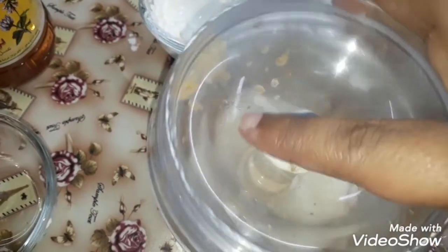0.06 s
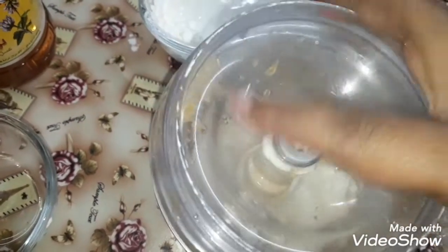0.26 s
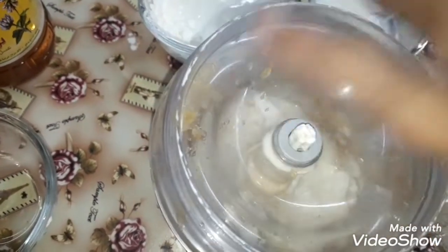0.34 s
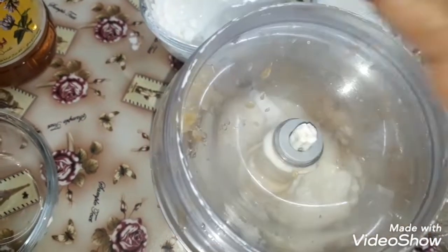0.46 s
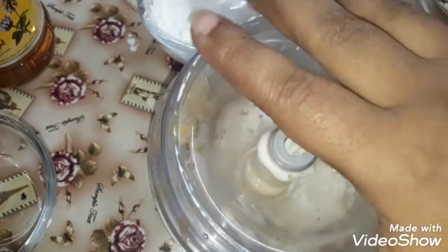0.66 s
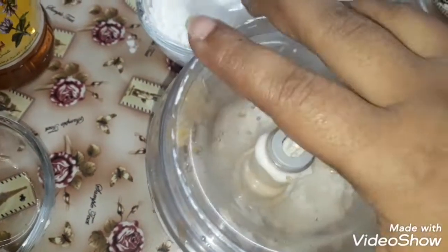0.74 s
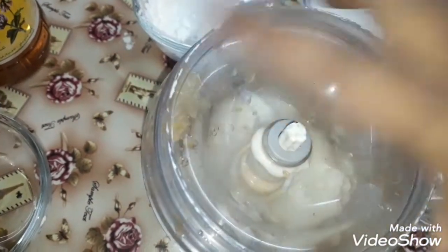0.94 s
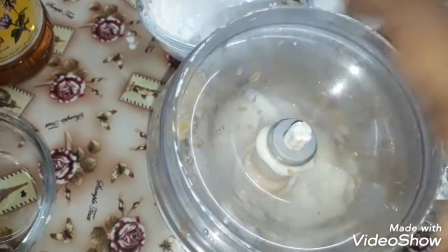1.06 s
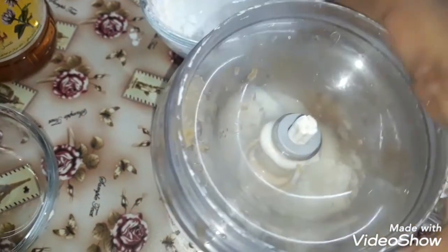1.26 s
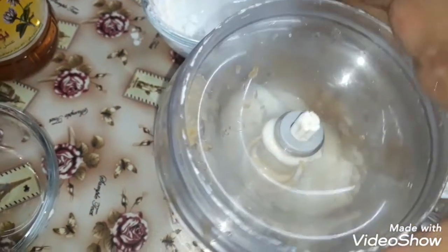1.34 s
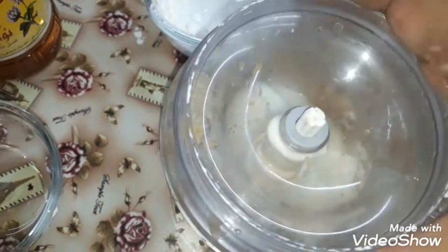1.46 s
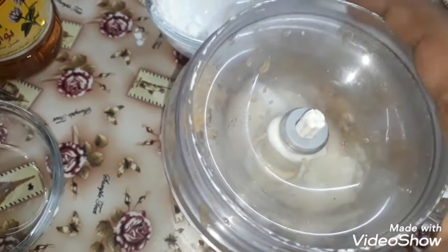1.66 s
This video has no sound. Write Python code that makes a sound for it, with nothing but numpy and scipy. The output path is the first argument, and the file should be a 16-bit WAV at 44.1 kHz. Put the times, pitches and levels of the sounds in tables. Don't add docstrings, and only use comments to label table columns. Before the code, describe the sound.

Hollow clacks of a clear plastic chopper bowl being nudged on a table, with faint finger rubs

```python
import sys
import numpy as np
from scipy import signal
from scipy.fft import rfft, irfft, next_fast_len
from scipy.io import wavfile
from scipy.ndimage import uniform_filter1d, map_coordinates

SR = 44100
rng = np.random.default_rng(int(sys.argv[2]) if len(sys.argv) > 2 else 0)


def undo_db(level):
    steps = np.asarray(level, float) / 20
    return 10 ** steps


def dump_mix(stems):
    frames = np.atleast_2d(stems).T
    limited = np.clip(frames, -1, 1)
    pcm = np.round(limited * 32767).astype(np.int16)
    wavfile.write(sys.argv[1], SR, pcm)


N = 74970


def unit(x):
    return x / np.sqrt(np.mean(x ** 2) + 1e-20)


def along(points, hz):
    f, v = np.transpose(points)
    return np.interp(np.log(hz + 1), np.log(f + 1), v)


def wobble(rate_hz):
    return map_coordinates(rng.standard_normal(200), [np.arange(N) * min(rate_hz, 90) / SR])


def filtered(x, response):
    m = next_fast_len(len(x) + 8192)
    return irfft(rfft(x, m) * response(np.fft.rfftfreq(m, 1 / SR)), m)[:len(x)]


def add(track, s, sound):
    part = track[round(s * SR):][:len(sound)]
    part += sound[:len(part)]


# (frequency [Hz], t60 [s])
KITCHEN_T60 = [(150, 0.18), (400, 0.32), (1500, 0.2), (4000, 0.2), (10000, 0.23)]
WET_DB, THUD_WET_DB, FIRST_WALL_S = -8.5, -12, 0.005


def kitchen(x, wet_db, feed=None):
    hz, t, z = signal.stft(rng.standard_normal(SR // 2), SR, nperseg=256)
    decay = undo_db(-60 * t / along(KITCHEN_T60, hz)[:, None])
    tail = signal.istft(z * decay, SR, nperseg=256)[1]
    feed = x if feed is None else feed
    delayed = np.pad(feed, (round(FIRST_WALL_S * SR), 0))
    wet = signal.fftconvolve(delayed, tail / np.linalg.norm(tail))
    return undo_db(wet_db) * wet + np.pad(x, (0, len(wet) - len(x)))


# (centre [Hz], width [Hz], level [dB])
HUM_BANDS = [(97, 18.4, -69), (188.6, 22, -67.5), (312, 10, -78.5), (405.5, 5.8, -72)]
# (frequency [Hz], level [dB])
MOTOR_LINES = [(99.8, -66), (398, -62.5)]
# (frequency [Hz], density [dB per Hz])
AIR_SPECTRUM = [(25, -25), (60, -10), (130, -13), (250, -6), (700, -8.5), (2200, -18.5), (6000, -30.5),
                (15500, -34.5)]
# (time [s], level [dB])
HAND_STIR = [(0, 3), (0.501, 2.5), (.57, -1), (.64, 4), (0.852, 1.5), (1.0, 1), (1.2, 2.5), (1.45, 0.5),
             (1.7, 3)]
AIR_DB, AIR_PATCH_DB, MOTOR_WAVER_DB = -60, 0.8, 2
BOOM_HZ, BOOM_WIDTH_HZ, BOOM_DB, BOOM_WAVER_DB = 350, 54, -67.5, 5.2


def noise_band(hz, width_hz):
    return unit(filtered(rng.standard_normal(N), lambda f: np.exp(-0.5 * ((f - hz) / width_hz) ** 2)))


def room_tone():
    t = np.arange(N) / SR
    z = signal.stft(rng.standard_normal(N + 512), nperseg=512)[2]
    patches = uniform_filter1d(rng.standard_normal(z.shape), size=6, axis=0)
    patches = uniform_filter1d(patches, size=10, axis=1)
    air = signal.istft(z * undo_db(AIR_PATCH_DB * unit(patches)), nperseg=512)[1][:N]
    air = undo_db(AIR_DB) * unit(filtered(air, lambda f: undo_db(along(AIR_SPECTRUM, f))))

    hum = sum(undo_db(db) * noise_band(hz, width_hz) for hz, width_hz, db in HUM_BANDS)
    motor = np.zeros(N)
    for hz, db in MOTOR_LINES:
        level = undo_db(db + MOTOR_WAVER_DB * wobble(12.28))
        motor += level * np.sin(2 * np.pi * hz * t + 0.63 * wobble(13.95))

    boom = undo_db(BOOM_DB + BOOM_WAVER_DB * wobble(30.0)) * noise_band(BOOM_HZ, BOOM_WIDTH_HZ)
    stir = undo_db(np.interp(t, *np.transpose(HAND_STIR)))
    return stir * (air + motor + boom) + hum


# (time [s], length [s], level [dB], centre [Hz], swelling share of length [0-1])
BRUSHES = [(0.004, 0.026, -65, 5770, 0.18), (0.056, 0.11, -61, 7400, 0.13), (0.12, 0.03, -55, 7160, 0.21),
           (0.184, 0.23, -61.5, 7800, 0.053), (0.872, 0.085, -65, 10300, 0.56),
           (0.968, 0.016, -65, 10100, 0.38), (1.135, 0.022, -67.5, 5230, 0.23),
           (1.183, 0.086, -59.5, 2200, 0.52), (1.186, 0.07, -61, 6500, 0.64),
           (1.559, 0.048, -58, 2480, 0.68), (1.557, 0.063, -58.5, 5930, 0.51),
           (1.672, .03, -74, 8100, 0.43)]
# (centre [Hz], half width [Hz], level [dB])
RUBBED_MODES = [(1000, 140, 5), (1600, 200, 10.5), (2700, 160, 7.5), (3500, 150, 8.5), (5840, 260, 2.5),
                (9560, 1900, -3.5)]
BRUSH_OCTAVES, BRUSH_EDGE_S, BRUSH_GRAIN_DB, BRUSH_SWELL_DB = 0.93, 0.0053, 2.8, 7.5


def brushes():
    out, t = np.zeros(N), np.arange(SR // 8) / SR

    def stirred(f):
        return 1 + sum(undo_db(db) / (1 + ((f - hz) / width_hz) ** 2) for hz, width_hz, db in RUBBED_MODES)

    for s, length_s, db, centre_hz, rise in BRUSHES:
        def colour(f):
            octaves = np.log2((f + 1) / centre_hz)
            return stirred(f) * np.exp(-0.5 * (octaves / BRUSH_OCTAVES) ** 2)

        noise = rng.standard_normal(len(t))
        grain_db = BRUSH_GRAIN_DB * unit(uniform_filter1d(rng.standard_normal(len(t)), size=90))
        hiss = unit(filtered(noise * undo_db(grain_db), colour))
        peak_s = np.clip(rise, 0, 1) * length_s
        swell_db = np.interp(t, [0, peak_s, length_s], [-BRUSH_SWELL_DB, 0, -BRUSH_SWELL_DB])
        edges = np.clip(np.minimum(t, length_s - t) / BRUSH_EDGE_S, 0, 1)
        add(out, s, kitchen(undo_db(db + 2) * edges * undo_db(swell_db) * hiss, WET_DB))
    return out


# (time [s], level [dB], pitch [Hz], t60 [s])
THUDS = [(.012, -35.5, 376, 0.047), (0.05, -47, 338, 0.072), (0.091, -48, 425, 0.058),
         (0.139, -27.5, 279, 0.03), (0.174, -40, 306, 0.065), (0.2222, -28, 337, 0.069),
         (0.2501, -8.5, 333, 0.013), (0.261, -22.5, 317, 0.059), (0.3092, -9.5, 380, 0.022),
         (0.31, -25, 211, 0.079), (.340, -39, 350, 0.096), (0.398, -22.5, 200, 0.042),
         (0.4286, -22, 320, 0.017), (0.461, -30.5, 330, 0.02), (0.493, -46, 366, 0.03),
         (0.652, -15, 383, 0.026), (.682, -39, 350, 0.032), (.717, -20.5, 272, 0.017),
         (0.7308, -21, 319, 0.015), (.740, -39, 277, 0.025), (.752, -32, 327, 0.015),
         (0.786, -43, 365, 0.073), (1.272, -29, 283, 0.029), (1.282, -39.5, 290, 0.037),
         (1.312, -42.5, 374, 0.043), (1.606, -37, 205.6, 0.095), (1.608, -20.5, 331, 0.017),
         (0.654, -39, 74, 0.27), (0.671, -21, 276, 0.018), (1.606, -49.5, 2745, 0.045),
         (.3998, -43.5, 3544, 0.027)]
# (time [s], level [dB], pitch [Hz], t60 [s])
FAVOURED_MODES = [(0.2209, -44, 1090, 0.016), (0.2508, -33, 1640, 0.023), (0.2512, -33, 754, 0.059),
                  (0.2515, -51, 3500, 0.032), (0.3091, -37.5, 2240, .045), (0.3098, -33, 1223, .04),
                  (0.3098, -34.5, 1720, 0.012), (0.31, -36, 2686, 0.073), (0.31, -40.5, 3470, 0.039),
                  (0.3997, -38, 953, 0.027), (0.3998, -35, 706, .02), (0.404, -43, 1000, .025),
                  (0.409, -54, 3500, 0.03), (0.41, -36, 300, 0.025), (0.4293, -43.5, 1660, .018),
                  (0.4296, -52, 1980, 0.022), (0.6537, -27.5, 1603, 0.015), (0.658, -37.5, 2600, 0.018),
                  (0.665, -36, 909, 0.043), (0.684, -57, 2630, .05), (0.732, -39, 1560, 0.016),
                  (1.177, -52, 330, 0.037), (1.212, -55, 1570, .04), (1.227, -57, 2700, .03),
                  (1.2699, -41, 1700, 0.023), (1.2697, -46.5, 2700, 0.034), (1.2695, -45, 3490, 0.031),
                  (1.2705, -35, 950, 0.021), (1.271, -30, 565, 0.021), (1.279, -47, 1300, .03),
                  (1.285, -48, 694, 0.048), (1.288, -48, 1450, .03), (1.36, -54, 350, 0.087),
                  (1.41, -49, 377, 0.047), (1.461, -54, 337, 0.058), (1.49, -49, 384, .04),
                  (1.587, -50, 1620, 0.03), (1.605, -39, 590, .02)]
THUD_RISE_CYCLES = 0.8


def thuds():
    out, t = np.zeros(N), np.arange(SR // 3) / SR
    for s, db, hz, t60_s in THUDS + FAVOURED_MODES:
        swell = 1 - np.exp(-(t * hz / THUD_RISE_CYCLES) ** 2)
        decay = undo_db(db + 3 - 60 * t / t60_s)
        add(out, s, kitchen(decay * swell * np.sin(2 * np.pi * hz * t), THUD_WET_DB))
    return out


MODE_SCATTER_DB = 1.5


def ring(modes, cut_hz, t):
    hz, db, t60_s = np.transpose(modes)[..., None]
    size = undo_db(db + MODE_SCATTER_DB * rng.standard_normal(hz.shape)) / (1 + (hz / cut_hz) ** 4)
    tones = size * undo_db(-60 * t / t60_s) * np.sin(2 * np.pi * hz * t)
    return tones.sum(0) * (1 - np.exp(-t * cut_hz * 2 * np.pi))


# (time [s], bowl ring [dB], lid ring [dB], contact cut-off [Hz], crack [dB])
KNOCKS = [(.0095, -52.5, -52, 3565, -41), (0.135, -49, -48.5, 3900, -40.5), (0.193, -66, -57, 3000, -51),
          (0.2508, -26, -35, 1560, -46.5), (.252, -26.5, -29.5, 1240, -64),
          (.3097, -18, -25.5, 2700, -31.5), (.3117, -28.5, -25, 1910, -47), (0.3997, -45, -34, 2220, -47),
          (0.423, -65, -72, 3070, -50), (0.4294, -37.5, -41.5, 1780, -61), (0.6527, -24, -19, 2000, -41),
          (0.655, -43, -32.5, 2500, -34.5), (.732, -36.5, -33.5, 1370, -55),
          (1.2692, -41.5, -33.5, 2880, -49), (1.271, -37.5, -59, 1800, -60), (1.604, -40, -50, 1310, -56),
          (1.61, -42, -42, 3600, -52.5)]
# (frequency [Hz], level [dB], t60 [s])
BOWL_MODES = [(642, -18.5, 0.048), (750, -5, 0.028), (972, 1, 0.017), (1104, -12, 0.053),
              (1650, 2.5, 0.0077), (1800, -11, 0.013), (1900, -37, 0.04), (2676, -2.5, 0.028),
              (3490, -8.5, 0.023), (4560, -4.5, 0.0091)]
# (frequency [Hz], level [dB], t60 [s])
LID_MODES = [(800, -9.5, 0.019), (898, -5.5, 0.049), (1536, 0, 0.019), (1870, -11, 0.014),
             (2600, 3, 0.0078), (3240, -33, 0.0059)]
# (frequency [Hz], level [dB])
CRACK_SPECTRUM = [(1500, -11), (3500, 4.5), (6000, 1.5), (9000, 4), (12000, -3), (16000, -13)]
CRACK_T60_S, CLATTER_DB, CLATTER_T60_S = 0.025, 8.5, 0.011
BLOW_PITCH_SHARE, ROOM_FEED_T60_S = 0.557, 0.007


def knocks():
    out, t = np.zeros(N), np.arange(SR // 5) / SR
    for s, bowl_db, lid_db, cut_hz, crack_db in KNOCKS:
        blow = undo_db(CLATTER_DB - 60 * t / CLATTER_T60_S)
        blow = blow * np.sin(2 * np.pi * BLOW_PITCH_SHARE * cut_hz * t)
        blow = blow * (1 - np.exp(-t * cut_hz * 2 * np.pi))
        bowl = undo_db(bowl_db) * (ring(BOWL_MODES, cut_hz, t) + blow)
        lid = undo_db(lid_db) * (ring(LID_MODES, cut_hz, t) + blow)
        body = bowl - lid

        crack = rng.standard_normal(len(t)) * undo_db(crack_db + 0.5 - 60 * t / CRACK_T60_S)
        crack = filtered(crack, lambda f: undo_db(along(CRACK_SPECTRUM, f)))
        early = body * undo_db(-60 * t / ROOM_FEED_T60_S)
        early = early * np.linalg.norm(body) / np.linalg.norm(early)
        add(out, s, kitchen(body + crack, WET_DB, early + crack))
    return out


MIC_PEAK_HZ, MIC_PEAK_WIDTH_HZ, MIC_PEAK_DB = 8900, 700, 4
MIC_LOW_CUT_HZ, MIC_TOP_HZ = 155, 13500


def microphone(x):
    def response(f):
        damping = 1j * f * MIC_PEAK_WIDTH_HZ
        port = 1 + (undo_db(MIC_PEAK_DB) - 1) * damping / (MIC_PEAK_HZ ** 2 - f * f + damping)
        low, high = f / MIC_LOW_CUT_HZ, f / MIC_TOP_HZ
        low_cut = -low ** 2 / (1 - low ** 2 + 1.4j * low)
        return port * low_cut / (1 - high ** 2 + 1.4j * high) ** 2
    return filtered(x, response)


# (frequency [Hz], level [dB])
SIDE_SPECTRUM = [(30, -15), (90, -7), (180, -3.5), (1000, -3.5), (4000, -5), (9000, -9.5), (15000, -10.5)]
SIDE_DB, SIDE_FOLLOWS_DB = -74.5, -38.5


def scene():
    mid = microphone(knocks() + thuds() + brushes()) + room_tone()
    level = np.sqrt(np.abs(uniform_filter1d(mid ** 2, size=1024)))
    noise = unit(filtered(rng.standard_normal(N), lambda f: undo_db(along(SIDE_SPECTRUM, f))))
    side = (undo_db(SIDE_DB) + undo_db(SIDE_FOLLOWS_DB) * level) * noise
    return np.array([mid + side, mid - side])


# (time [s], length [s], lower edge [Hz])
DROPOUTS = [(.127, .009, 4000), (.15, .04, 14000), (.243, .005, 2500), (.268, .005, 6000),
            (.289, .007, 3200), (.303, .004, 3500), (.316, .018, 11800), (.334, .06, 13800),
            (.637, .008, 2300), (.662, .022, 12300), (.684, .03, 14300), (1.262, .022, 11800),
            (1.56, .06, 13800)]
DROPOUT_DB = -25


def treble_gaps(x):
    hz, t, z = signal.stft(x, SR, nperseg=128, noverlap=96)
    lost = np.zeros((len(hz), len(t)), bool)
    for s, length_s, above_hz in DROPOUTS:
        lost |= (t > s) & (t < s + length_s) & (hz[:, None] > above_hz)
    z = z * np.where(lost, undo_db(DROPOUT_DB), 1)
    return signal.istft(z, SR, nperseg=128, noverlap=96)[1][:, :N]


def low_pass(x):
    return signal.sosfilt(signal.butter(12, 16430, fs=SR, output="sos"), x)


TOP_HZ, OFFSET = 15700, -0.0005


def record(dry):
    kept = treble_gaps(dry)
    limited = np.array([filtered(x, lambda f: f < TOP_HZ) for x in kept])
    return low_pass(OFFSET + limited)


dry = scene()
out = record(dry)
dump_mix(out)
```